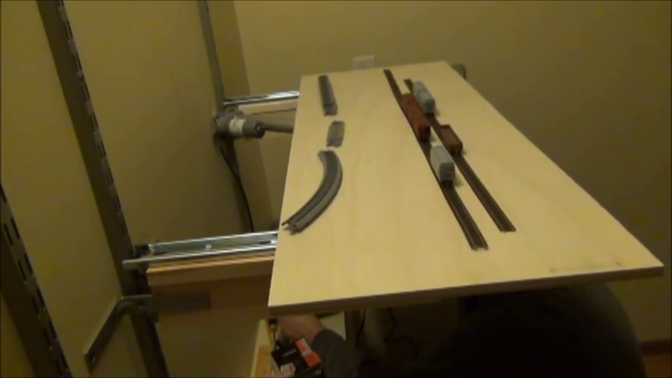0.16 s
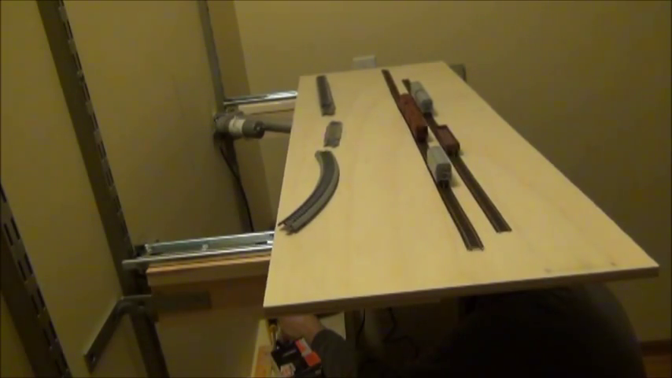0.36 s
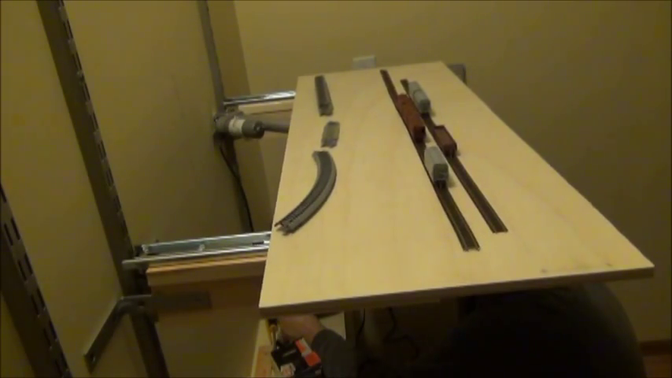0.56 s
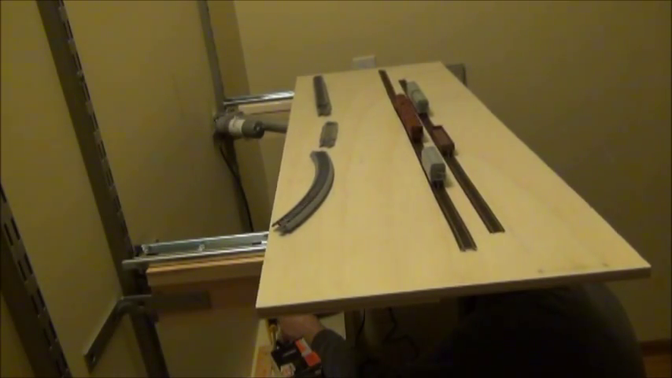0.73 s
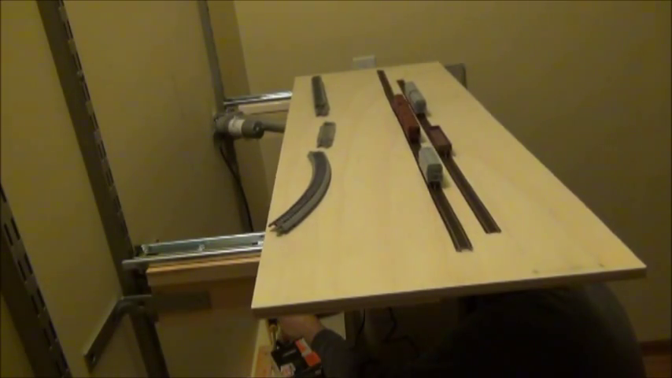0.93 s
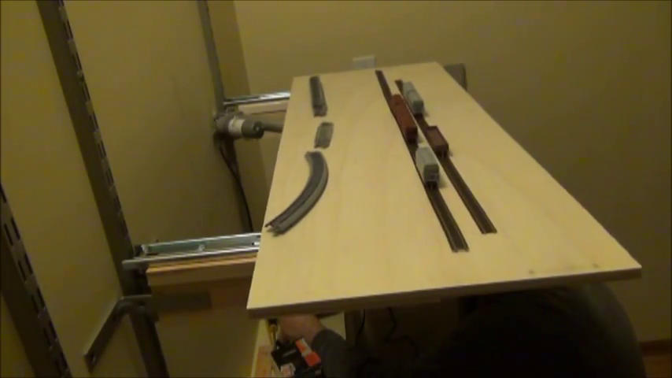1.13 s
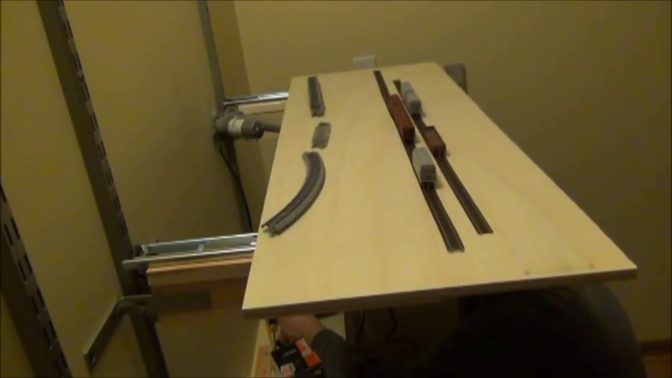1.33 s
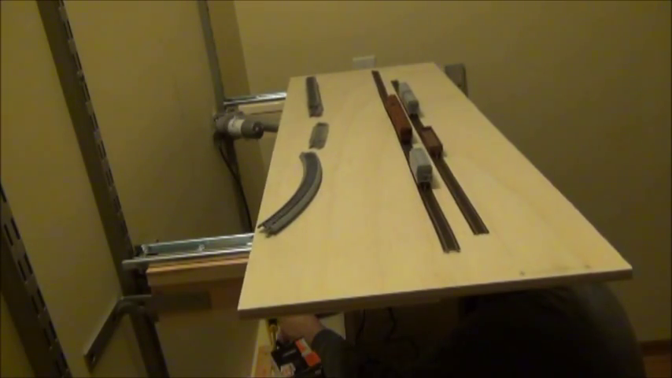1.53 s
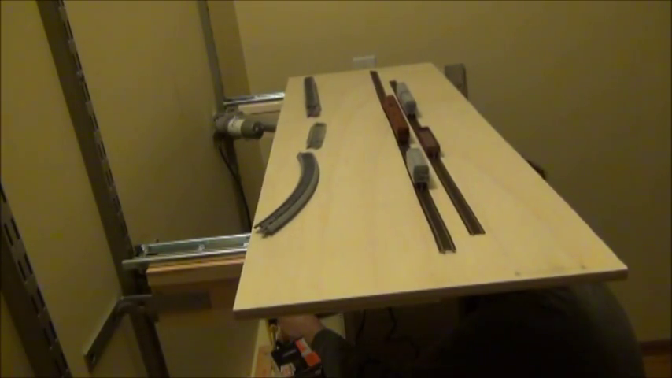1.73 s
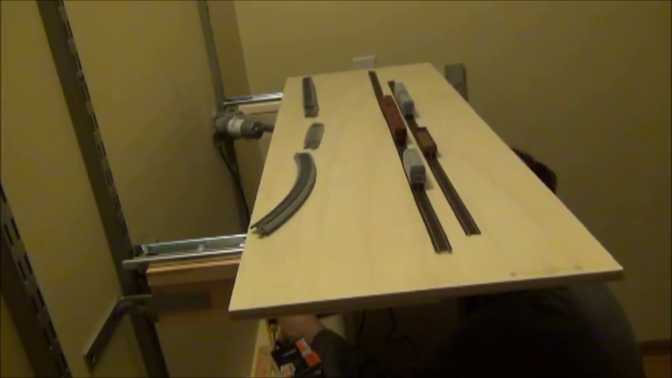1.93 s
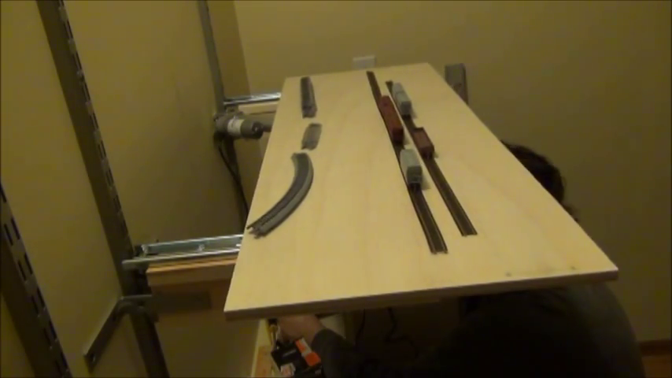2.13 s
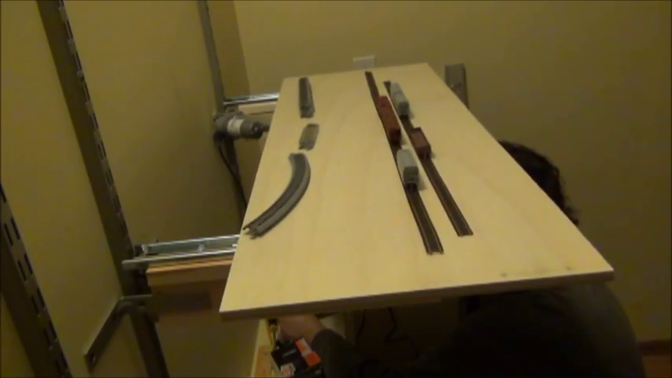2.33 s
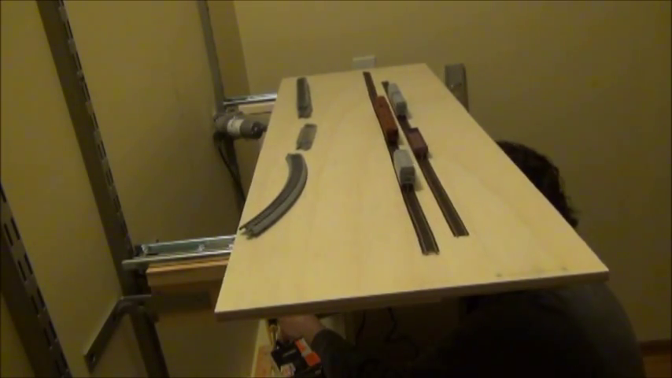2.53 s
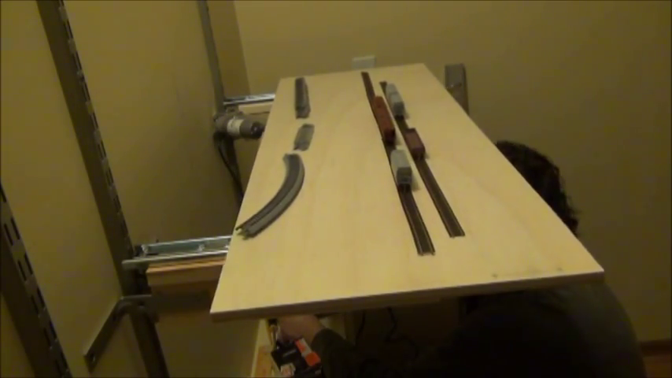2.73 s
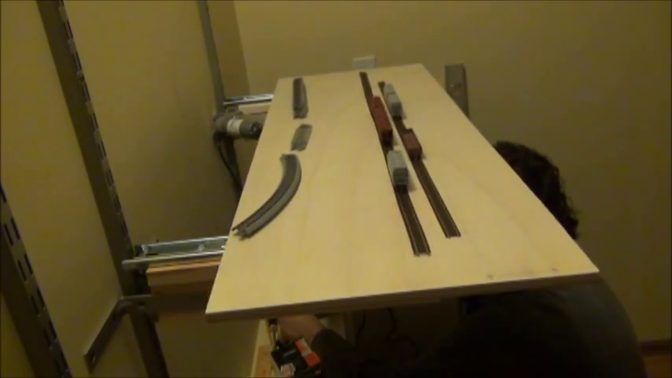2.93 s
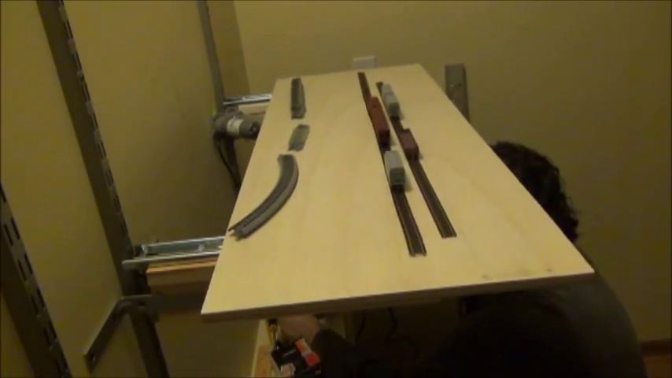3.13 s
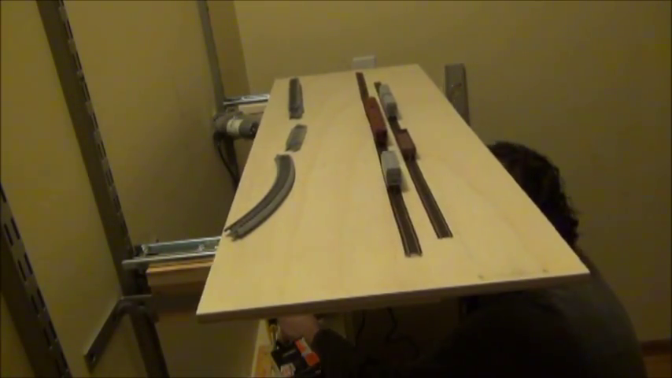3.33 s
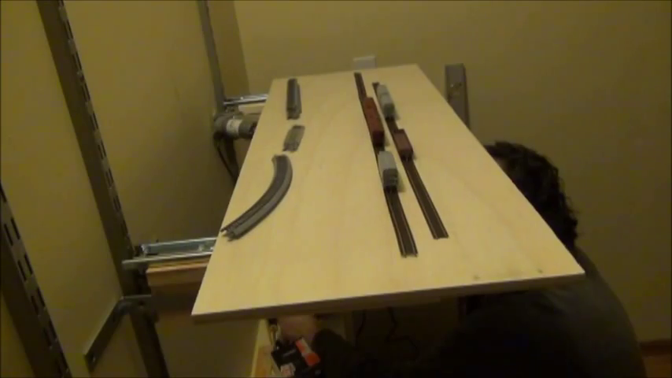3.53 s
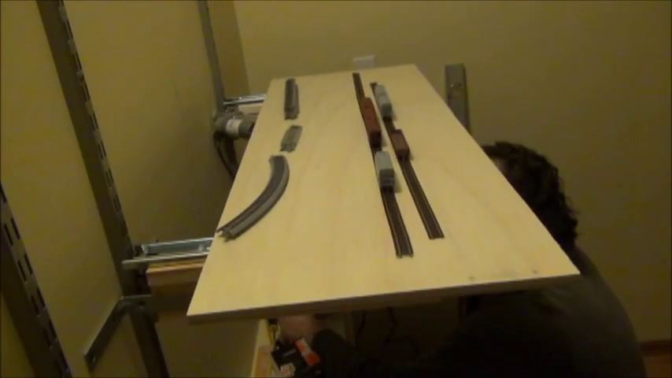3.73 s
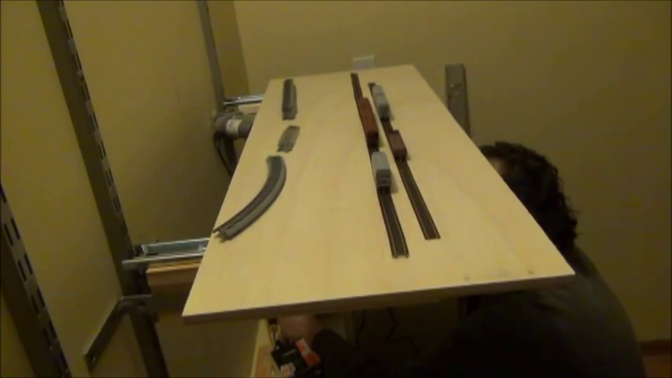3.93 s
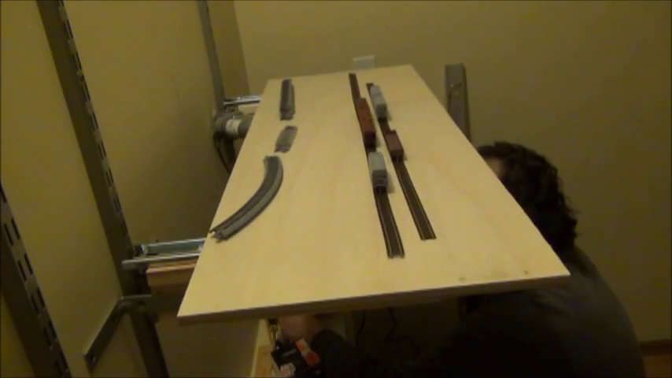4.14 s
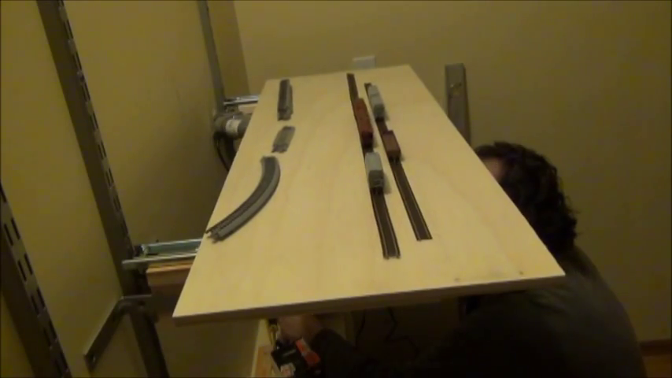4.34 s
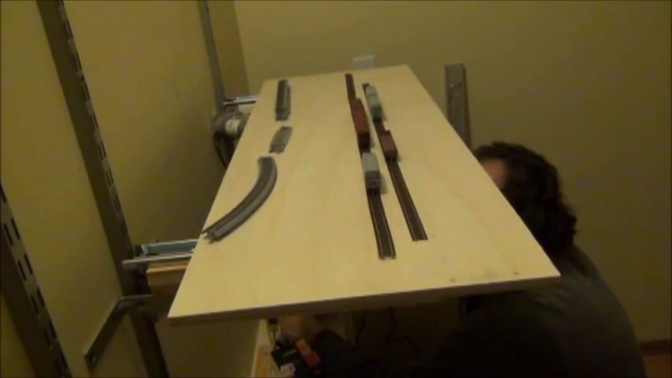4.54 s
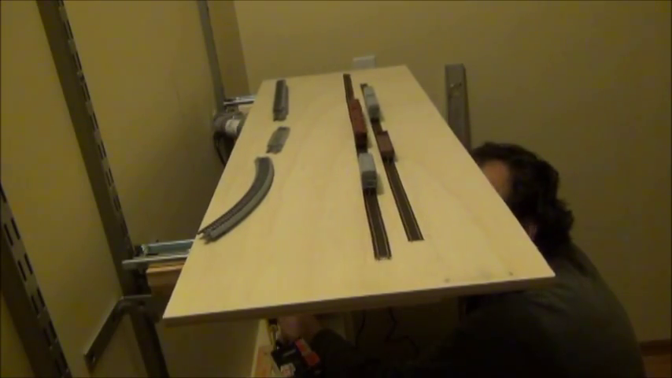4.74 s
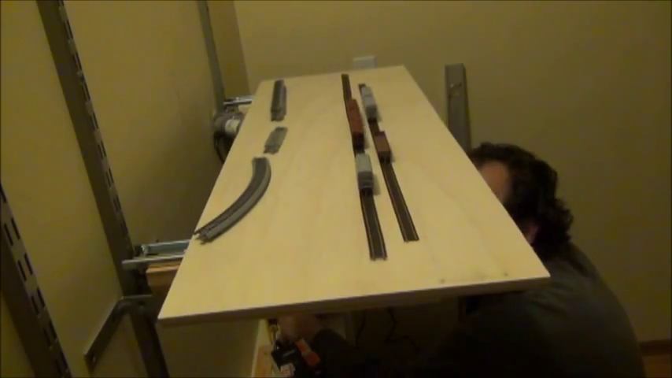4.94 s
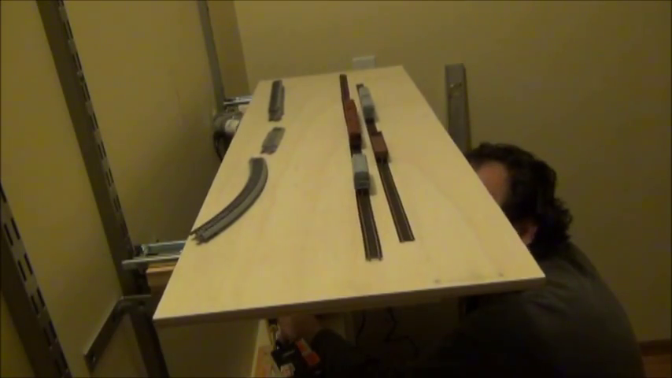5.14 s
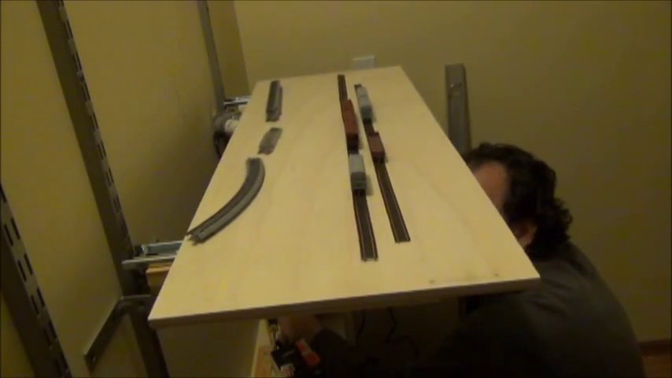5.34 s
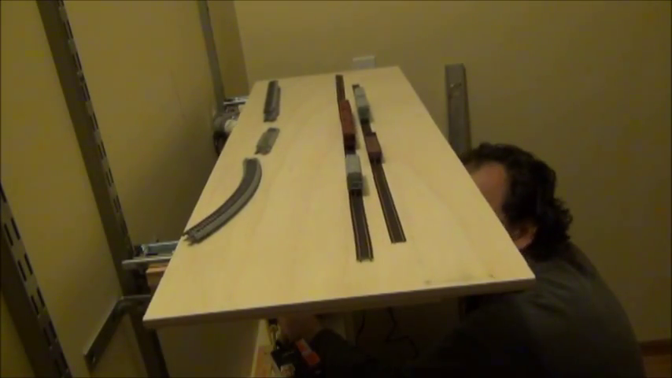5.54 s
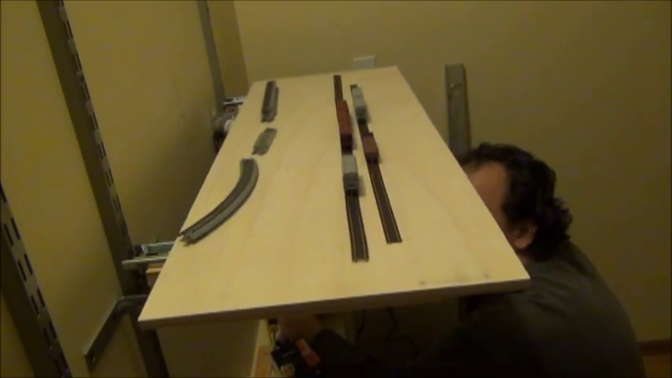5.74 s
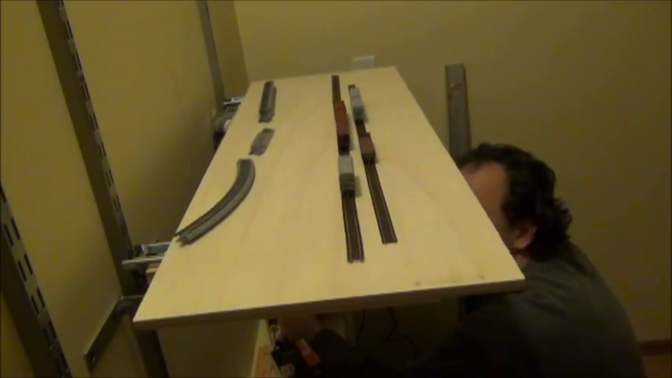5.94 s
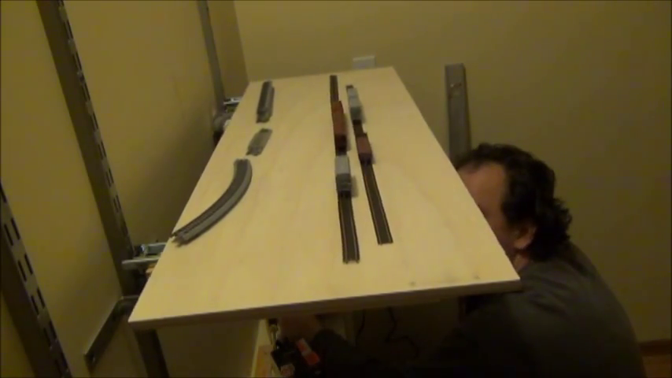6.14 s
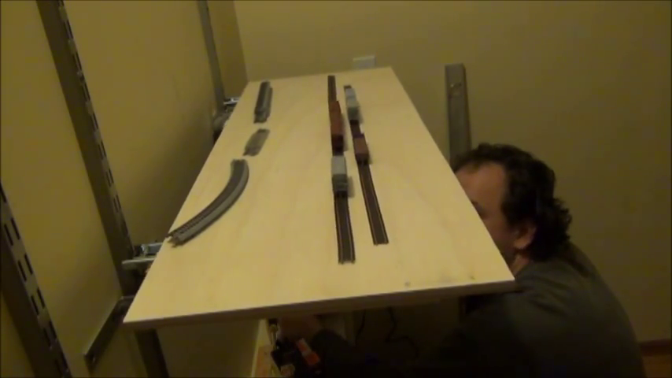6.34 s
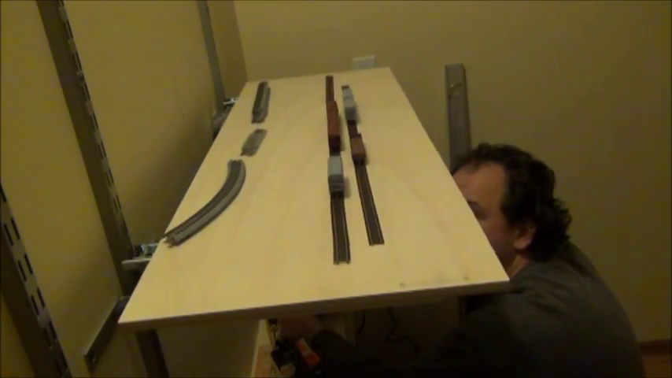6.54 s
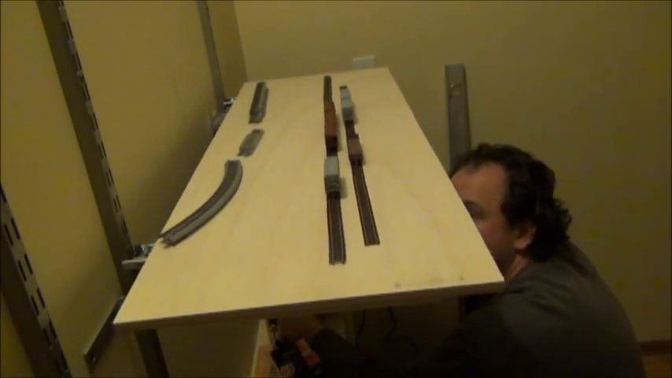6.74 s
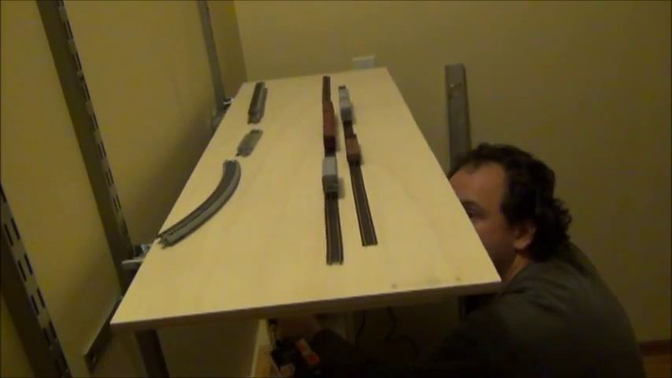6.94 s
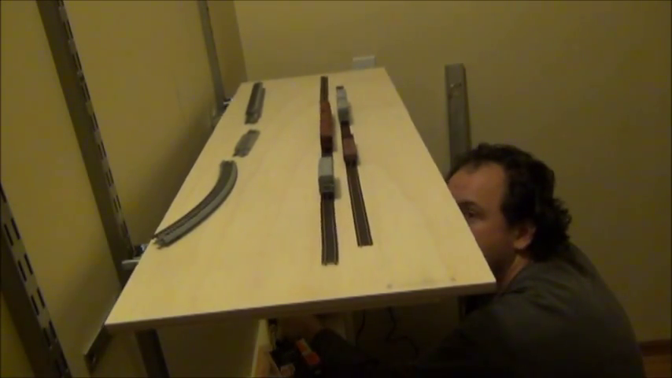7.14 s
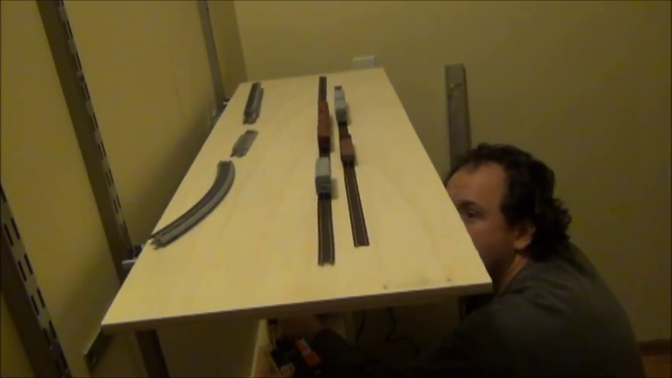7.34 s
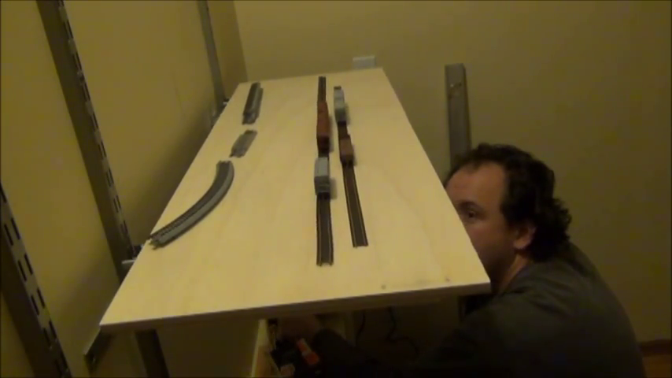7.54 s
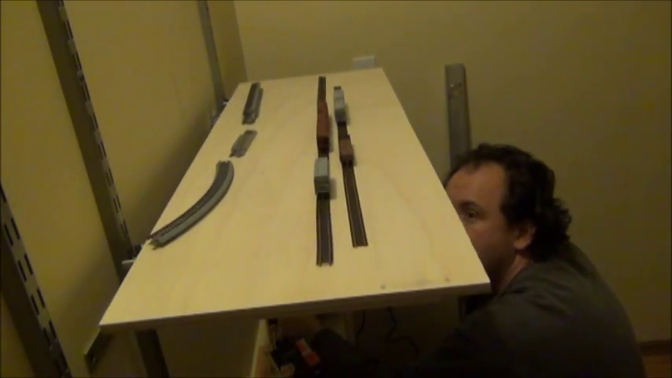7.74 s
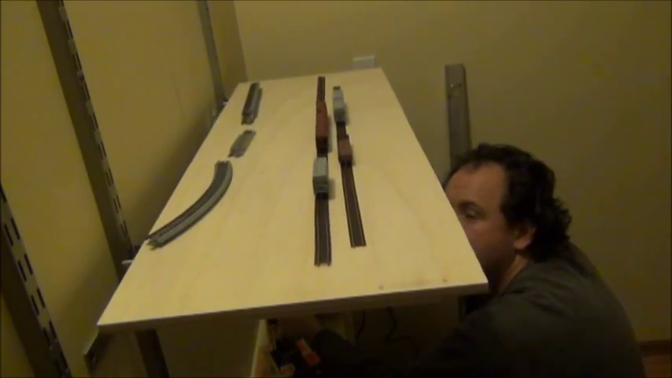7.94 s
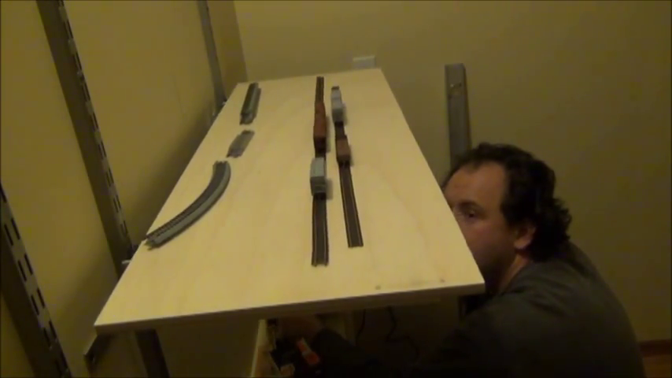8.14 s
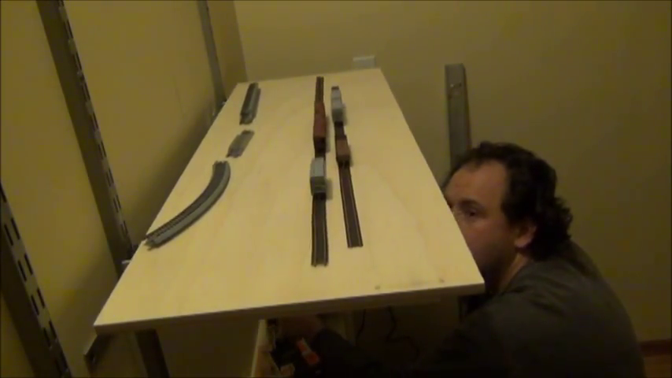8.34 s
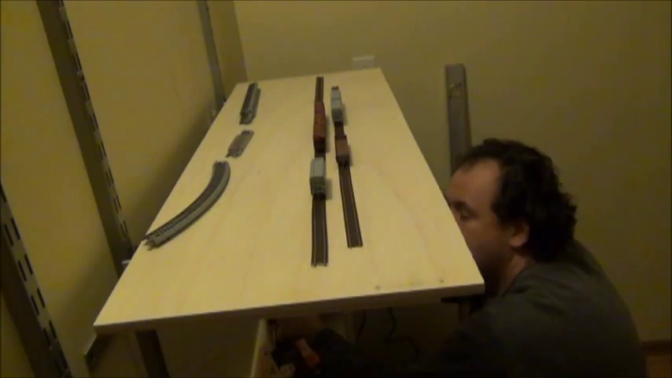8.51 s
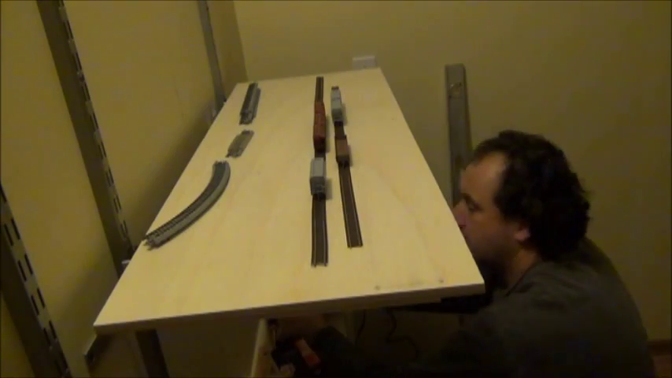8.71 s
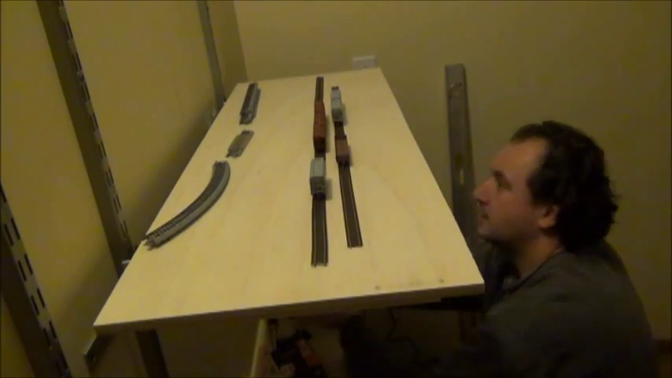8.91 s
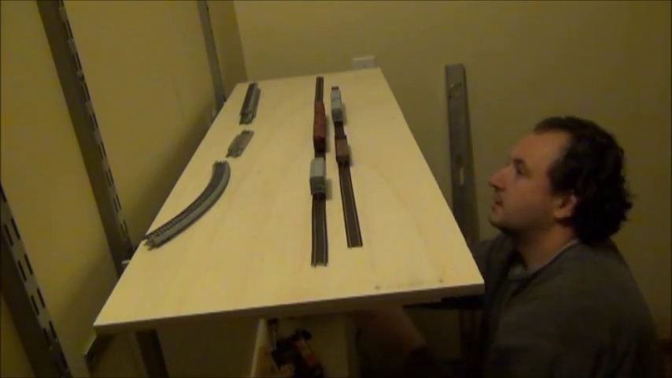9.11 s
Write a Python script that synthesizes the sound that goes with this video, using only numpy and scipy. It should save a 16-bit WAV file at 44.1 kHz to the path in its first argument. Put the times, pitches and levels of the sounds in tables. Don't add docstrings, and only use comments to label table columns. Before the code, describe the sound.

Steady buzzing motor whine in a small bare room, interrupted by two brief falling glides and restarts, then a final coast-down and soft cloth rustle.

```python
import sys
import numpy as np
from scipy import signal
from scipy.fft import rfft, irfft, next_fast_len
from scipy.io import wavfile
from scipy.ndimage import uniform_filter1d, map_coordinates

SR = 44100
rng = np.random.default_rng(int(sys.argv[2]) if len(sys.argv) > 2 else 0)


def waveform_to_disk(signal):
    frames = np.transpose(np.atleast_2d(signal))
    scaled = np.clip(frames, -1, 1) * 32767
    samples = np.round(scaled).astype(np.int16)
    wavfile.write(sys.argv[1], SR, samples)


def magnitude_from_level(level_db):
    exponent = np.asarray(level_db, float) / 20
    return 10 ** exponent


N = 404378
TIME_S = np.arange(N) / SR
BINS = next_fast_len(N + SR // 2)
HZ = np.maximum(np.arange(BINS // 2 + 1) * SR / BINS, 1)

BARS, TURNS_PER_MESH = 12, 5
FULL_BAR_HZ = 688

# order [multiple of shaft speed], drawer_out_db [dB rms], drawer_in_db [dB rms]
FIELD_HUM = [(4, -36.2, -35.3), (6, -35.3, -40.5), (8, -42.3, -38.0), (10, -44.6, -48.4),
             (11, -54.5, -60.1), (12, -36.3, -36.6), (14, -54, -53), (16, -45.8, -40.8), (18, -59.1, -54.3),
             (22, -47.8, -53.3), (24, -50.1, -48.3), (28, -53.8, -48.9), (30, -54.2, -57.3)]
# order [multiple of shaft speed], drawer_out_db [dB rms], drawer_in_db [dB rms]
BAR_WHINE = [(36, -54.5, -50.1), (38, -44.8, -52.4), (40, -46.0, -44.4), (41, -50.9, -47.0),
             (42, -51.9, -50.7), (44, -49.5, -47.1), (45, -51.7, -49.3), (47, -43.7, -44.4),
             (48, -32.8, -31.3), (49, -46.1, -43.9), (50, -55.4, -48.5), (52, -49.1, -45.1),
             (55, -51.1, -57.3), (56, -56.1, -51.0), (60, -37.2, -36.6), (61, -57.7, -51.3),
             (62, -51.7, -55.6), (64, -51.4, -51.9), (65, -54.1, -50.4), (70, -47.6, -49.6),
             (72, -36.6, -36.6), (74, -49.1, -53.5), (76, -51.0, -54.4), (84, -58.4, -51.3)]
# order [multiple of shaft speed], drawer_out_db [dB rms], drawer_in_db [dB rms]
BRUSH_SING = [(96, -44.3, -45.7), (98, -50.4, -49.4), (100, -50.4, -51.4), (105, -51.5, -48.9),
              (108, -49.9, -43.3), (118, -58.5, -47.2), (119, -51.5, -55.1), (120, -45.6, -41.4),
              (142, -49.0, -45.8), (144, -44.4, -45.1), (146, -48.0, -40.0), (148, -50.9, -57.5),
              (154, -53.7, -51.0), (156, -64.3, -46.1), (158, -44.6, -45.6), (166, -48.6, -51.3),
              (168, -52.9, -40.0), (170, -47.2, -46.1), (178, -63.9, -49.6), (182, -56.6, -43.0),
              (184, -45.1, -58.3), (190, -51.1, -54.0), (191, -44.5, -47.6), (192, -54.7, -47.8),
              (194, -49.6, -48.8), (200, -52.0, -51.1), (203, -50.9, -53.6), (205, -58.4, -51.9),
              (214, -54.4, -48.9), (216, -52.9, -50.6)]
# pitch_hz [Hz], level_db [dB per Hz]
BODY = [(201, -13.5), (716, 0.5), (1175, -10), (1920, -7.5), (2894, -4), (3524, -3), (3868, -10.5),
        (4727, -8), (5873, -5), (7707, -5.5), (8394, -1), (11775, 0), (12749, -5), (15614, -17.5)]
# pitch_hz [Hz], width_hz [Hz], boost_db [dB over the body]
BODY_MODES = [(427, 4.4, 19), (1000, 22, 5), (1954, 480, 7), (2240, 59, -2), (2575, 240, 1.5),
              (6110, 89, 6.5), (9650, 120, -1)]


def rms_one(x):
    return x / np.sqrt(np.mean(x ** 2) + 1e-20)


def in_time(rows):
    knots_s, *columns = np.transpose(rows)
    return [np.interp(TIME_S, knots_s, column) for column in columns]


def at_hz(points, hz):
    points_hz, points_db = np.transpose(points)
    return np.interp(np.log(hz), np.log(points_hz), points_db)


def through(x, response):
    return irfft(rfft(x, BINS) * response, BINS)[..., :N]


def drift(rate):
    knots = rng.standard_normal(1000)
    return map_coordinates(knots, [TIME_S * min(rate, 100)], order=3)


def colour_db(points, modes, hz):
    low_cut_hz = 115
    peaks = sum(db / (1 + (2 * (hz - mode_hz) / width_hz) ** 2) for mode_hz, width_hz, db in modes)
    return at_hz(points, hz) + peaks - 10 * np.log10(1 + (low_cut_hz / hz) ** 4)


def room_floor():
    # pitch_hz [Hz], level_db [dB per Hz]
    floor_colour = [(15, -38), (25, -17), (129, -8.5), (160, -19), (193, -4.5), (340, -9.5), (457, -13),
                    (848, -11), (2230, -21), (13200, -28.5), (15500, -24)]
    floor_db = -50
    mid, side = through(rng.standard_normal((2, N)), magnitude_from_level(at_hz(floor_colour, HZ)))
    side = through(side, magnitude_from_level(-2.0) / np.sqrt(1 + (2500 / HZ) ** 2))
    return magnitude_from_level(floor_db + 0.78 * drift(5)) * np.array([mid, side]) / np.std(mid)


def room_tail(t60, dull_hz):
    t = np.arange(SR // 2) / SR
    tail = rng.standard_normal(len(t)) * magnitude_from_level(-60 * t / t60) * (t > .003)
    return rfft(tail / np.sqrt(np.sum(tail ** 2)), BINS) / np.sqrt(1 + (HZ / dull_hz) ** 2)


def strokes():
    # start_s [s], level_db [dB], length_s [s]
    rubs = [
        (8.904, -42.5, .095),
        (9.12, -57, .02),
    ]
    fade_db_per_s, lift_db_per_s = 88, 250
    gain = 0
    for start_s, db, length_s in rubs:
        since = TIME_S - start_s
        fade_db = fade_db_per_s * np.clip(since, 0, length_s)
        lift_db = lift_db_per_s * np.clip(since - length_s, 0, 1)
        gain = gain + (since > 0) * magnitude_from_level(db - fade_db - lift_db)
    return gain


def sleeve():
    # start_s [s], peak_db [dB]
    ticks = [
        (8.023, -44),
        (8.9045, -38),
    ]
    grains = rng.standard_normal(N) * magnitude_from_level(2.1 * rng.exponential(1, N))
    cloth = magnitude_from_level(-2.5 * np.log2(HZ / 1000)) / (1 + (900 / HZ) ** 2)
    out = rms_one(through(grains, cloth)) * strokes()
    decay = np.exp(-np.arange(2000) / SR / .006)
    for start_s, peak_db in ticks:
        out[round(start_s * SR):][:2000] += magnitude_from_level(peak_db - 1) * rng.standard_normal(2000) * decay
    return out


def board_ring():
    # start_s [s], level_db [dB], pitch_hz [Hz], t60_s [s]
    ring = (7.716, -31, 230, .13)
    start_s, db, pitch_hz, t60_s = ring
    t = np.maximum(TIME_S - start_s, 0)
    return magnitude_from_level(db - 60 * t / t60_s) * np.sin(2 * np.pi * pitch_hz * t) * np.minimum(t / .02, 1)


def drawer_rollers(whine_db, slow):
    # pitch_hz [Hz], level_db [dB per Hz]
    roller_colour = [(12, -43), (20, 5), (43, 3), (81, -56), (98, -4.5), (118, 19), (150, -10), (190, -6),
                     (250, -43), (420, -120)]
    rollers_db = -56.5
    rumble = rms_one(through(rng.standard_normal(N), magnitude_from_level(at_hz(roller_colour, HZ)) * (HZ < 190)))
    return rumble * magnitude_from_level(rollers_db + whine_db + 23 - 4.1 * slow + 3.2 * drift(8.8))


def shaft_speed():
    # time_s [s], speed_hz [commutator bars per s]
    pull_speed = [(0, 688.3), (.6, 689.1), (1.2, 688.5), (2.3, 688.1), (3, 687.8), (4.2, 687.6), (6, 687.6),
                  (6.78, 687.1)]
    # off_s [s], on_s [s], dry_friction [bars per s], more near the screw's end
    switch = [
        (6.860, 7.095, 520),
        (7.332, 8.021, 500),
        (8.128, 10, 690),
    ]
    coast_s, spin_up_s = .59, .019
    full, = in_time(pull_speed)
    speed = full.copy()
    for off_s, on_s, friction in switch:
        start = speed[round(off_s * SR)]
        coasting_s = np.clip(TIME_S, off_s, on_s) - off_s
        coast = (start + friction) * np.exp(-coasting_s / coast_s) - friction
        coast = np.maximum(coast, 1)
        regained = 1 - np.exp(-np.maximum(TIME_S - on_s, 0) / spin_up_s)
        speed = np.where(TIME_S > off_s, coast + (full - coast) * regained, speed)
    return speed


def casing_response():
    # pitch_hz [Hz], level_db [dB per Hz]
    casing_colour = [(88, -51.5), (150, -19), (257, -8.5), (318, -13.5), (441, -10.5), (649, -10),
                     (900, -7.5), (1250, -20), (1870, -10), (2810, -6), (4630, -18), (6300, -8.5),
                     (7500, -17.5), (10800, -4.5), (15000, -29)]
    # pitch_hz [Hz], width_hz [Hz], boost_db [dB over the casing]
    casing_modes = [(444, 33, 6), (1032, 40, 9.5), (1800, 93, 1.5), (2356, 20, 10), (2930, 95, 3),
                    (3546, 240, 6), (6550, 380, 5.5), (8360, 270, 8.5),
                    (1930, 300, 9)]
    ripple_db = 1.9 * map_coordinates(rng.standard_normal(400), [HZ / 70], order=3)
    return magnitude_from_level(colour_db(casing_colour, casing_modes, HZ) + ripple_db)


def brush_hiss(turns, pulse_db):
    pulses = np.exp(-3.0 * (2 * turns % 1))
    pulses = pulses + 0.2 * np.exp(-3.0 * (turns % 1)) + .5 * np.exp(-4.0 * (4 * turns % 1))
    return rms_one(rng.standard_normal(N) * magnitude_from_level(pulse_db * pulses + 0.42 * drift(9)))


def gear_chatter(hiss, slow, loose):
    chatter = magnitude_from_level(-11.0) * hiss * np.sqrt(loose)
    bright = through(chatter, 1 / (1 + (4600 / HZ) ** 6))
    chatter = chatter - bright * slow ** 1.16
    upper = through(chatter, 1 / (1 + (2500 / HZ) ** 8) / (1 + (HZ / 6000) ** 6))
    return chatter - .85 * upper * slow ** 3


def glides(turns, bar_hz):
    # order [multiple of shaft speed], level_db [dB]
    harmonics = [(48, -26), (60, -31), (72, -21.5), (84, -31), (96, -26.5), (120, -31), (144, -33)]
    low_hz, high_hz = 1800, 3850
    tones = 0
    for order, db in harmonics:
        once_a_turn = 1 + .5 * np.sin(2 * np.pi * turns + order) + .35 * np.sin(4 * np.pi * turns)
        waver = .7 * drift(100)
        tone = np.sin(2 * np.pi * order * turns + waver)
        tones = tones + magnitude_from_level(db + 1.6 * drift(45)) * once_a_turn * tone
    spin_up = uniform_filter1d(1. * (np.gradient(bar_hz) > 0), size=600)
    band = 1 / np.sqrt((1 + (low_hz / HZ) ** 40) * (1 + (HZ / high_hz) ** 24))
    return tones * magnitude_from_level(-3 * spin_up), band


def rotor(turns, lines, path_db, even_db, odd_db, mesh_db, wander_db):
    # order [multiple of shaft speed], change_db [dB]
    midway = [(6, 3.5), (10, -2), (16, -11), (72, 1.5), (108, 4), (146, 2)]
    # order [multiple of shaft speed], change_db [dB]
    travel_ends = [(6, -4), (8, 1.5), (24, 4), (47, -3), (49, -2), (60, -6), (72, -5), (96, -3), (108, -8),
                   (120, -3), (146, -2), (158, -6), (168, 3), (182, -3), (184, 3)]
    count, size = 14, 40960
    order = np.arange(1400) / TURNS_PER_MESH
    full_hz = np.maximum(order * FULL_BAR_HZ / BARS, 1)

    base_db = np.where(order % 2 == 0, even_db, np.where(order % 1 == 0, odd_db, mesh_db))
    base_db = base_db + colour_db(BODY, BODY_MODES, full_hz)
    base_db = base_db + 7.5 * np.minimum(rng.standard_normal(len(order)), 1)
    named = np.vstack([FIELD_HUM, BAR_WHINE, BRUSH_SING])[:, 0]
    base_db[np.isin(order, named)] = -120
    level_db = base_db + np.zeros((count, 1))

    travel = np.linspace(-.15, 1.15, count)
    arch = np.exp(-((travel - .33) / .22) ** 2)
    ends = np.linspace(-1, 1, count) ** 4 - .15
    for k, out_db, in_db in lines:
        line_db = out_db + (in_db - out_db) * travel
        line_db = line_db + dict(midway).get(k, 0) * arch + dict(travel_ends).get(k, 0) * ends
        level_db[:, round(k) * TURNS_PER_MESH] = line_db
    weak = np.clip(1 - (level_db.mean(0) + 51.5) / 20, .12, 1)
    level_db += wander_db * weak * rng.standard_normal(level_db.shape)
    level_db -= np.interp(full_hz, HZ, path_db)

    phase_walk = np.cumsum(rng.standard_normal(level_db.shape), axis=0)
    phase = rng.uniform(0, 2 * np.pi, len(order)) + .5 * weak * phase_walk
    patterns = irfft(magnitude_from_level(level_db) * np.exp(1j * phase), size) * size / np.sqrt(2)
    station = np.clip(TIME_S / 7, 0, 1) * (count - 1)
    angle = turns / TURNS_PER_MESH % 1 * (size - 1)
    return map_coordinates(patterns, [station, angle], order=1, mode="nearest")


def motor(walls_db):
    # time_s [s], load_db [dB over the mean]
    load = [(0, -1), (1.2, -0.64), (2.8, -0.4), (4.2, -0.65), (5.5, -0.16), (6.8, -0.47), (8.15, -0.8),
            (8.4, 2)]
    bar_hz = shaft_speed()
    load_db, = in_time(load)
    whine_db = -22 + load_db - 10 * np.log10(1 + (0.35 * FULL_BAR_HZ / bar_hz) ** 3.2)
    effort = magnitude_from_level(whine_db + 22.5)
    slow = np.clip(1 - bar_hz / FULL_BAR_HZ - .004, 0, 1)
    loose = np.clip(30 * slow, 0, 1)
    turns = np.cumsum(bar_hz / BARS) / SR
    screw_turns = 26
    turns = turns + .002 * np.sin(2 * np.pi * turns / screw_turns) + .0008 * drift(6)

    hum_db, detune_db, follows, build_s = 3.5, 1400, .1, 0.046
    held = turns + np.cumsum((1 - follows) * slow) * FULL_BAR_HZ / BARS / SR
    hum = rotor(held, FIELD_HUM, walls_db, even_db=-100, odd_db=-100, mesh_db=-100, wander_db=0.5)
    tuned = magnitude_from_level(hum_db - detune_db * slow ** 3)
    memory = np.exp(-1 / (build_s * SR))
    built_up = signal.lfilter([1 - memory], [1, -memory], tuned, zi=[memory * 0 + tuned[0]])[0]
    hum = hum * np.minimum(tuned, built_up)

    whine = rotor(turns, BAR_WHINE, walls_db, even_db=-55.0, odd_db=-59.5, mesh_db=-63.5, wander_db=2.5)
    sing = rotor(turns, BRUSH_SING, walls_db, even_db=-100, odd_db=-100, mesh_db=-100, wander_db=3.5)
    lines = (whine * magnitude_from_level(3.5 - 420 * slow) + sing * magnitude_from_level(5 - 500 * slow)) * effort

    hiss = brush_hiss(turns, pulse_db=2.0) * effort
    steady = through(magnitude_from_level(-24.5) * hiss * (1 - loose), magnitude_from_level(colour_db(BODY, BODY_MODES, HZ)))
    chatter = gear_chatter(hiss, slow, loose)
    casing = casing_response()
    tones, band = glides(turns, bar_hz)
    swept = through(chatter, casing) + through(tones * effort * loose, casing * band)
    swept = swept * np.minimum(bar_hz / 60, 1)
    return hum + lines + steady + swept + drawer_rollers(whine_db, slow)


def scene():
    # [dB, side minus mid]
    stereo_width = [(60, -9), (110, -38), (200, -72), (380, -21), (700, -22.5), (1290, -13.5),
                    (2380, -11.5), (4400, -11.5), (8120, -7.5), (15000, -12.5)]
    walls = 1 + magnitude_from_level(-13) * room_tail(.36, 6000)
    walls_db = 10 * np.log10(uniform_filter1d(abs(walls) ** 2, size=60))
    near = board_ring() + sleeve() - motor(walls_db)
    mid = through(near, walls)
    between = 1j * room_tail(0.23, 30000)
    spread = between / np.sqrt(abs(between) + .01) * magnitude_from_level(at_hz(stereo_width, HZ))
    side = through(near, walls * spread) + 0.025 * mid
    mid, side = np.array([mid, side]) + room_floor()
    return np.array([mid + side, mid - side])


def band_limit(x):
    return signal.sosfilt(signal.butter(12, 16300, fs=SR, output="sos"), x)


def record(dry):
    cutoff_hz = 15780
    mix = through(dry, 1. * (HZ < cutoff_hz))
    return band_limit(mix)


dry = scene()
out = record(dry)
waveform_to_disk(out)
```